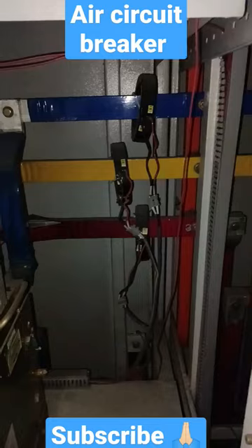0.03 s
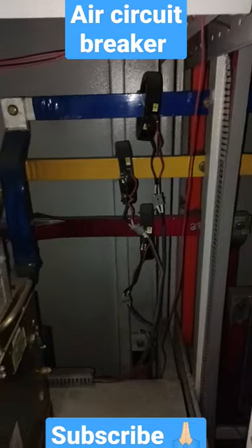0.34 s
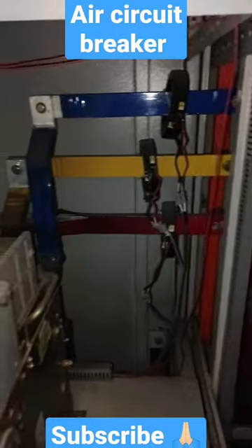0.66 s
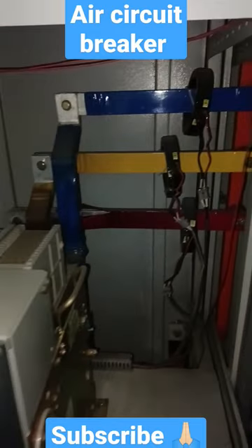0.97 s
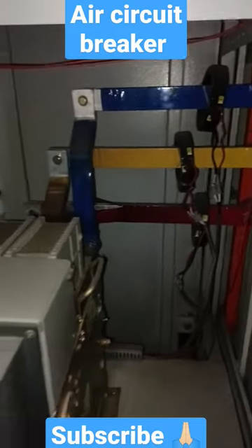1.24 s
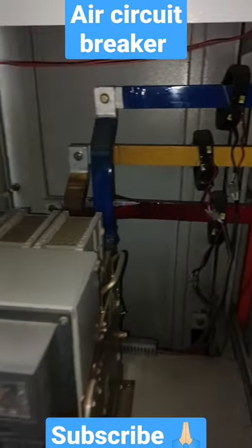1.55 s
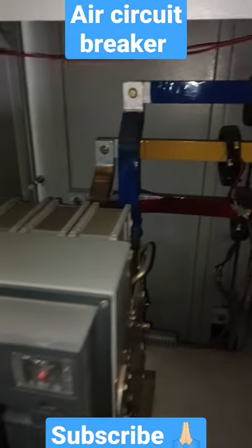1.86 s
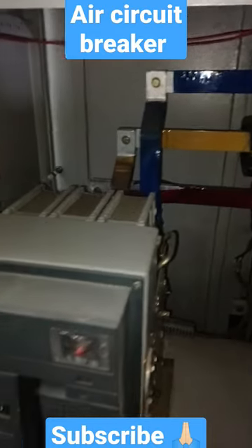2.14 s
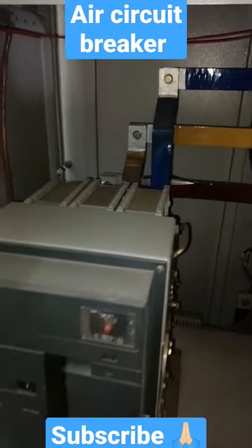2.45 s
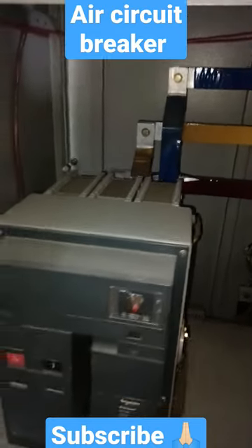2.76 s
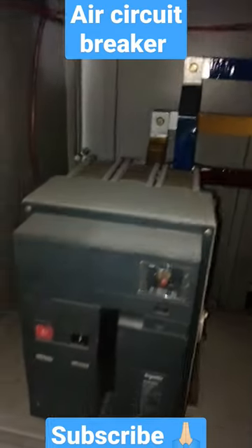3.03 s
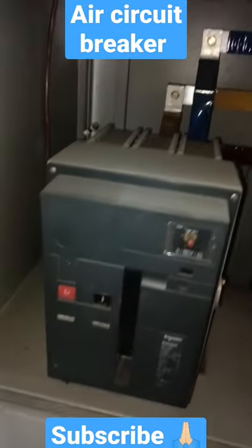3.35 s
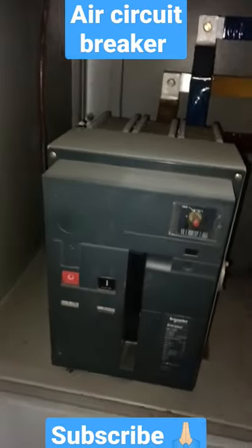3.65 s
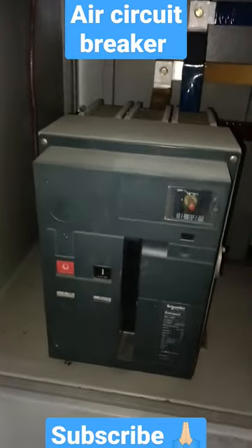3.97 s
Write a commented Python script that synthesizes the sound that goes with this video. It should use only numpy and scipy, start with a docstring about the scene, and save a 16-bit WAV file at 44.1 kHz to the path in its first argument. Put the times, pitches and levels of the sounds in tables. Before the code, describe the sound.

A steady electrical buzzing hum comes from an open cabinet indoors, with a low rush of air behind it. Its tone shifts gently as the close microphone drifts, then loses some brightness as the microphone backs away.

```python
"""An open switchgear cabinet.

In an electrical room, ventilation rumbles and rushes and a fan whines faintly over the buzz of iron
cores and busbars. A handheld stereo microphone drifts through the hum's standing waves, so the partials
swell and sink. As it backs out of the cabinet, its right side loses the bright reflections off the steel."""
import sys
import numpy as np
from scipy import signal
from scipy.fft import rfft, irfft
from scipy.io import wavfile
from scipy.ndimage import uniform_filter1d, minimum_filter1d

SR = 44100
rng = np.random.default_rng(int(sys.argv[2]) if len(sys.argv) > 2 else 0)


def output_pcm(signal):
    """Save a mono or channel-first signal as 16-bit PCM at the path in sys.argv[1].

    Samples are clipped to [-1, 1] before scaling.
    """
    pcm = np.clip(np.atleast_2d(signal).T, -1, 1) * 32767
    wavfile.write(sys.argv[1], SR, np.round(pcm).astype(np.int16))


N = 176400
TIME = np.arange(N) / SR
HUM_HZ = 99.95  # twice the mains frequency

# spectral density of the rush before the duct resonances (f/Hz, left level/dB, right level/dB)
RUSH_SPECTRUM = [(10, -72.4, -72.4), (28, -57, -58.5), (71.4, -53.5, -54.5), (96, -46, -46.5),
                 (120.4, -39.5, -39.5), (151, -36, -35.5), (216, -38, -40), (282, -39, -40),
                 (332, -43, -43.5), (430, -41, -40.5), (620, -44, -44), (690, -47.5, -47.5),
                 (1040, -50, -48.5), (1570, -52, -48.5), (2097, -57.5, -51.5), (3080, -68.5, -64),
                 (3580, -71, -68), (4550, -76.5, -67.5), (5670, -77.5, -75.5), (6730, -86, -82),
                 (7650, -81, -80.5), (8540, -80, -98), (9650, -71, -103), (10870, -82.5, -101),
                 (11800, -82.5, -86.5), (12750, -82, -82), (13500, -93, -95), (14300, -93, -94),
                 (15000, -108, -109)]
# likeness of the sound field at the two sides (f/Hz, correlation)
CORRELATION = [(30, 0.94), (100, .98), (190, 0.99), (300, 0.87), (400, 0.76), (490, 0.44), (800, 0.55),
               (1050, -0.000036), (1600, -0.11), (2400, 0.19), (3400, -0.087), (6000, 0.052)]
# narrow resonances of fans and ducts (f/Hz, width/Hz, lift/dB)
DUCT_MODES = [(120.2, 4.3, 7), (160, 13, 4.5), (186, 10, 3), (222.8, 7, 8), (277, 13, 5.5),
              (358, 14.4, 4.5), (427, 15, 3), (476, 5, 5.5)]
# blade tone of the fan (t/s, level/dB)
WHINE_LEVEL = [(.2, -55), (1.2, -36), (1.85, -29), (2.22, -24), (2.5, -38.5), (3.1, -55), (3.85, -41),
               (4, -36)]
# hum partials that swell and sink at random (harmonic number, left level/dB, right level/dB)
WANDERING_PARTIALS = [(1, -39, -40), (2, -40, -32), (4, -28.5, -25.5), (5, -33, -37), (8, -38, -39),
                      (10, -38, -37.5), (11, -36, -38.5), (12, -41, -33), (13, -36, -38), (16, -39, -39),
                      (17, -47, -43), (18, -46, -38.5), (43, -68, -53.5)]
# hum partials that follow STANDING_WAVES (harmonic number, lean to the left/dB, left phase lead/rad)
PATH_PARTIALS = [(3, 1.1, -0.077), (6, 4, 0.45), (7, 4, -.6), (9, 0.5, -1.44), (15, -3.5, 2.1)]
# standing waves along the microphone's path (t/s, then level/dB of harmonics 3, 6, 7, 9, 15)
STANDING_WAVES = [(.2, -23.5, -19, -27, -29, -48), (.55, -20.5, -21, -33, -28, -47),
                  (.92, -20, -28, -38, -33.5, -38), (1.15, -20.5, -21.5, -29, -29.5, -29),
                  (1.45, -22, -20.5, -32, -31, -28), (1.8, -15.5, -29.5, -39, -38, -31),
                  (2.4, -15.5, -32, -40, -51, -43), (3.1, -16, -33, -51, -50, -34),
                  (4, -19.5, -28.5, -42, -45, -41)]
# colouring away from the steel wall (f/Hz, left gain/dB, right gain/dB)
SHADE_SPECTRUM = [(150, 2, 1.5), (333, 1, 2), (607, 0.5, 0), (1040, 0.5, -0.5), (1570, 0.7, -2.5),
                  (2710, 0, -10), (4500, 0, -13.5), (7000, -4, -8.5), (9600, -0.2, -6), (12500, -2.5, -7)]
# the microphone's retreat (t/s, factor on the decibels of SHADE_SPECTRUM)
SHADE_DEPTH = [(.45, -0.00017), (1.6, -0.031), (2.5, -0.02), (2.6, 0.12), (2.99, 0.32), (3.03, 0.85),
               (3.5, 0.83), (4, 1.1)]
# fade-in of the whole sound (t/s, gain/dB)
FADE_GAIN = [(.165, -94), (.173, -23.5), (.185, -16), (.21, -10), (.27, -7.5), (.34, -4), (.48, -1.5),
             (.7, -3)]
# further swell of the bass (t/s, gain/dB)
BASS_GAIN = [(.2, -2.5), (.3, -0.5), (.45, 0.5)]


def amp(db):
    """Amplitude ratio: tenfold for every 20 dB."""
    return 10 ** (np.asarray(db) / 20)


def curve(table, column=1):
    """Linear interpolation of a table column in time."""
    columns = np.transpose(table)
    return np.interp(TIME, columns[0], columns[column])


def spectrum(table, hz, column=1):
    """Interpolation of a table column on a log-frequency axis."""
    columns = np.transpose(table)
    return np.interp(np.log(hz + 1), np.log(columns[0] + 1), columns[column])


def drift(rate_hz):
    """Random fluctuation: low-passed Gaussian noise of rms 1."""
    hz = np.fft.rfftfreq(2 * N, 1 / SR)
    x = irfft(rfft(rng.standard_normal(2 * N)) * np.exp(-(hz / rate_hz) ** 2))[:N]
    return x / np.sqrt(np.mean(x ** 2))


def phasor(hz):
    """Simple harmonic motion at a random phase; the real part has rms 1."""
    return np.sqrt(2) * np.exp(2j * np.pi * (hz * TIME + rng.random()))


def turbulence(air, patch_db=1.03, flutter_db=0.5, flutter_hz=22):
    """Amplitude modulation: unsteady flow varies the level in time-frequency patches and as a whole."""
    bands = signal.stft(air, nperseg=512)[2]
    patches = rng.standard_normal(bands.shape[1:])
    for axis in (0, 1):
        patches = uniform_filter1d(patches, size=9, axis=axis)
    air = signal.istft(bands * amp(patch_db * patches / patches.std()), nperseg=512)[1][:, :N]
    return air * amp(flutter_db * drift(flutter_hz))


def ventilation():
    """Resonance: turbulent air excites the duct modes; the bass is coherent, the treble diffuse."""
    hz = np.fft.rfftfreq(N, 1 / SR)
    common, separate = rfft(rng.standard_normal((2, N))) * np.sqrt(SR / 2)  # unit power per hertz
    likeness = spectrum(CORRELATION, hz)
    left = common * amp(spectrum(RUSH_SPECTRUM, hz, column=1))
    right = likeness * common + np.sqrt(1 - likeness ** 2) * separate
    right *= amp(spectrum(RUSH_SPECTRUM, hz, column=2))
    ducts_db = sum(lift / (1 + (2 * (hz - f) / width) ** 2) for f, width, lift in DUCT_MODES)
    return turbulence(irfft(np.array([left, right]) * amp(ducts_db), N))


def fan_whine(blade_hz=780.5, waver_rad=0.82, waver_hz=12):
    """Periodic blade passage radiates a faint tone, which wavers by random phase modulation."""
    waver = np.exp(1j * waver_rad * drift(waver_hz))
    return amp(curve(WHINE_LEVEL)) * (phasor(blade_hz) * waver).real


def wandering_field(share=0.86, rate_hz=1.7):
    """Interference: a steady and a random part sum to the complex amplitude at a moving point."""
    return np.sqrt(1 - share) + np.sqrt(share / 2) * (drift(rate_hz) + 1j * drift(rate_hz))


def mains_hum():
    """Forced vibration: cores and busbars buzz in harmonics, heard through the room's standing waves."""
    hum = np.zeros((2, N))
    for harmonic, left_db, right_db in WANDERING_PARTIALS:
        hz = harmonic * HUM_HZ
        common, separate = wandering_field(), wandering_field()
        likeness = spectrum(CORRELATION, hz)
        field = np.array([common, likeness * common + 1j * np.sqrt(1 - likeness ** 2) * separate])
        field /= np.sqrt(np.mean(abs(field) ** 2, axis=1, keepdims=True))
        hum += amp([[left_db], [right_db]]) * (field * phasor(hz)).real
    sides = np.array([[1], [-1]])  # left, right
    for column, (harmonic, lean_db, lead_rad) in enumerate(PATH_PARTIALS, 1):
        partial = phasor(harmonic * HUM_HZ) * np.exp(1j * sides * lead_rad / 2)
        hum += amp(curve(STANDING_WAVES, column) + sides * lean_db) * partial.real
    return hum


def backing_out(x):
    """Reflection weakens with distance from the steel wall: treble falls, mostly on the right."""
    hz, t, bands = signal.stft(x, SR, nperseg=512)
    shade_db = np.array([spectrum(SHADE_SPECTRUM, hz, column) for column in (1, 2)])
    depth = np.interp(t, *np.transpose(SHADE_DEPTH))
    return signal.istft(bands * amp(shade_db[:, :, None] * depth), SR, nperseg=512)[1][:, :N]


def scene():
    """Superposition of rush, hum and whine at the moving microphone."""
    return backing_out(ventilation() + mains_hum() + fan_whine())


def limiter(x, knee=0.68, ceiling=0.9):
    """Soft limiting: a smoothed gain eases down peaks above the knee (levels as shares of full scale)."""
    peak = np.maximum(abs(x).max(0), knee)
    headroom = ceiling - knee
    gain = (knee + headroom * np.tanh((peak - knee) / headroom)) / peak
    return x * uniform_filter1d(minimum_filter1d(gain, size=301), size=301)


def record(dry, bass_hz=397, edge_hz=14700):
    """Gain and filtering: a quick fade-in with the bass last, peak limiting, then a steep low-pass."""
    bass = signal.sosfiltfilt(signal.butter(N=2, Wn=bass_hz, fs=SR, output="sos"), dry)
    faded = (dry - bass + bass * amp(curve(BASS_GAIN))) * amp(curve(FADE_GAIN))
    low_pass = signal.firwin(511, edge_hz, window=("kaiser", 9), fs=SR)
    return signal.oaconvolve(limiter(faded), low_pass[None], "same")


dry = scene()
out = record(dry)
output_pcm(out)
```